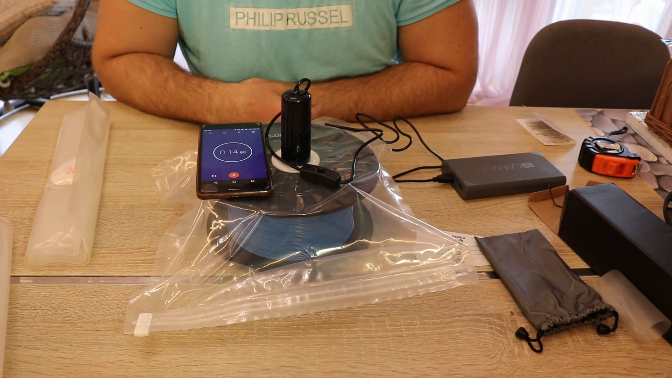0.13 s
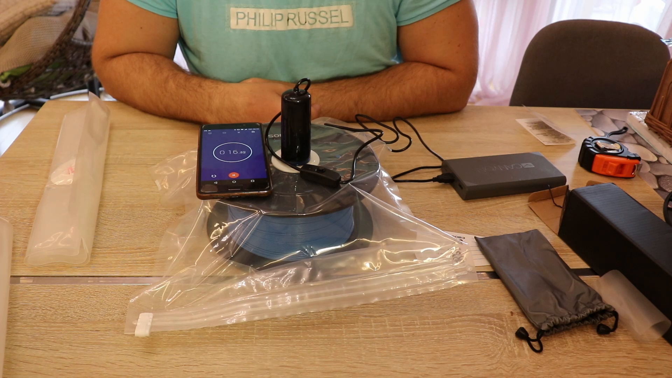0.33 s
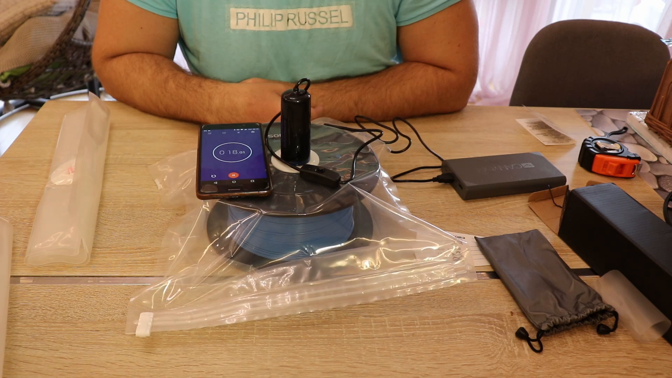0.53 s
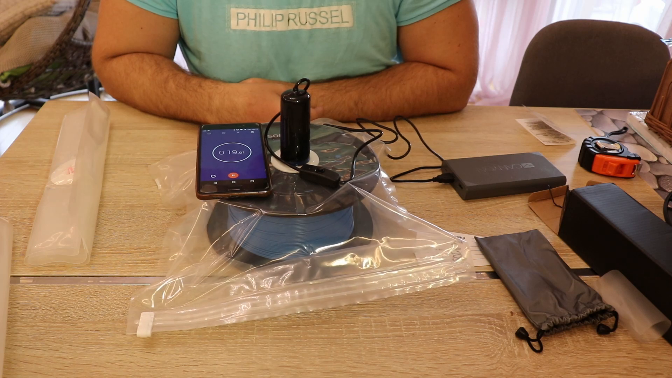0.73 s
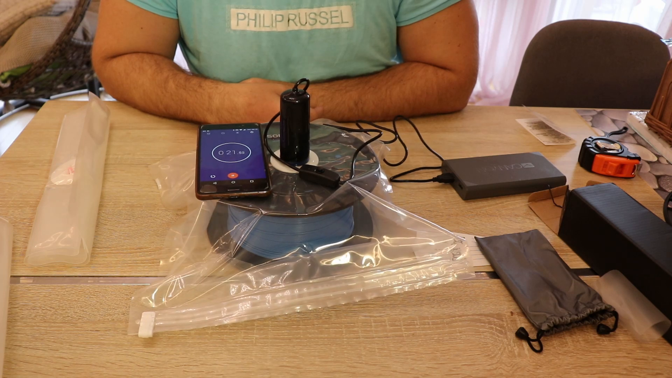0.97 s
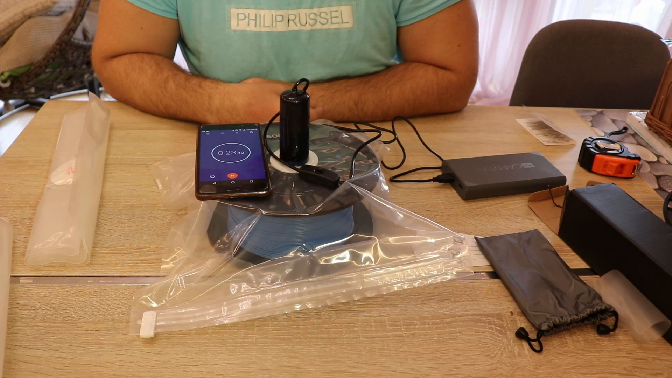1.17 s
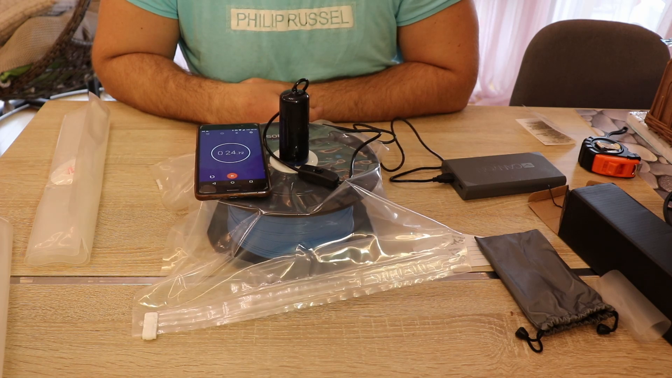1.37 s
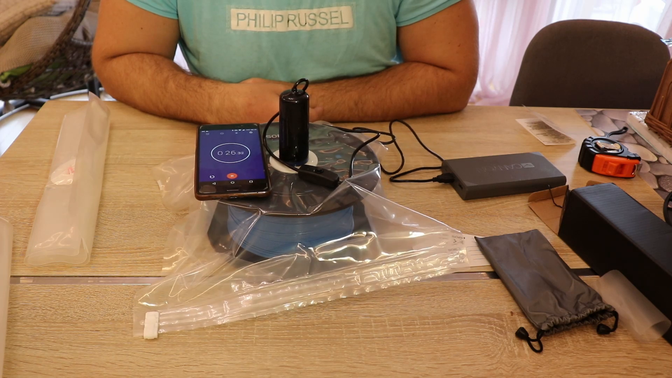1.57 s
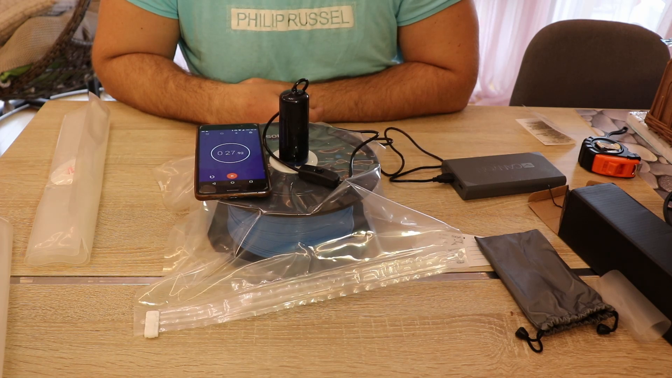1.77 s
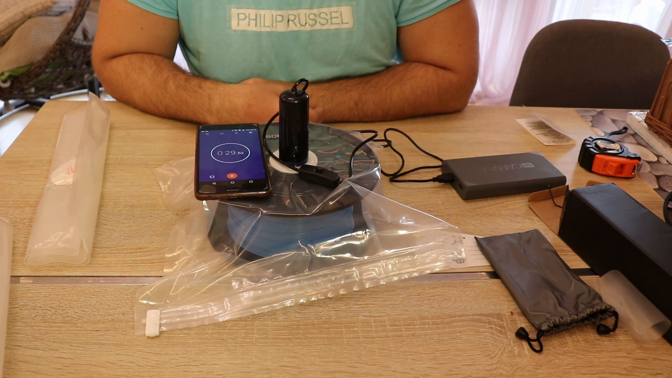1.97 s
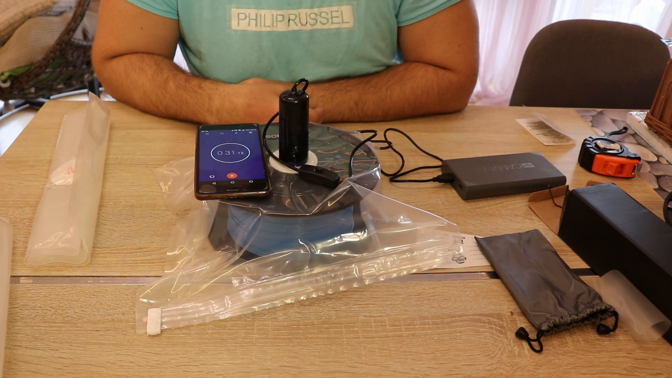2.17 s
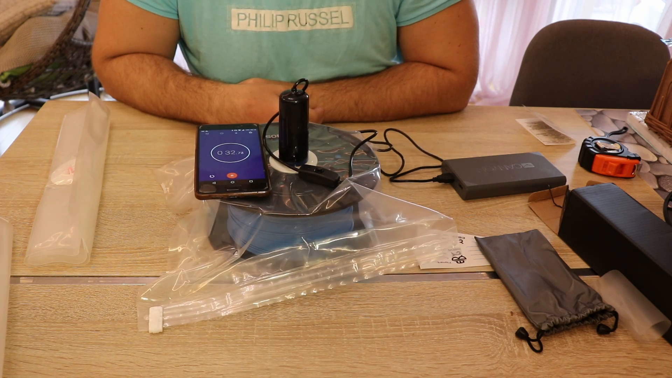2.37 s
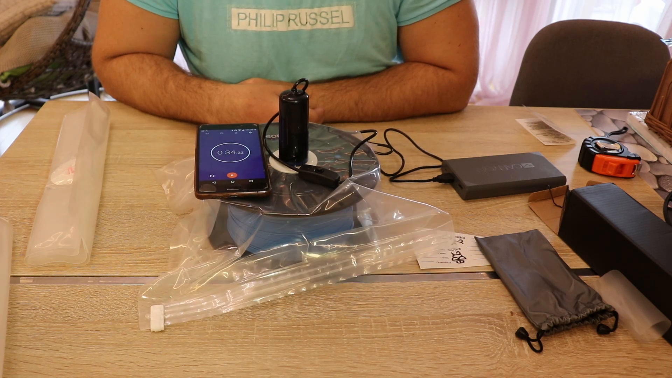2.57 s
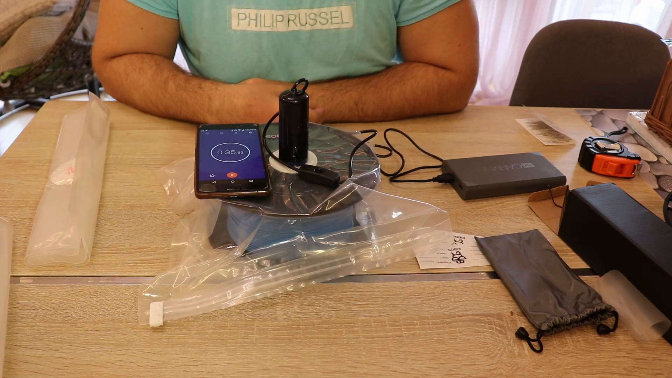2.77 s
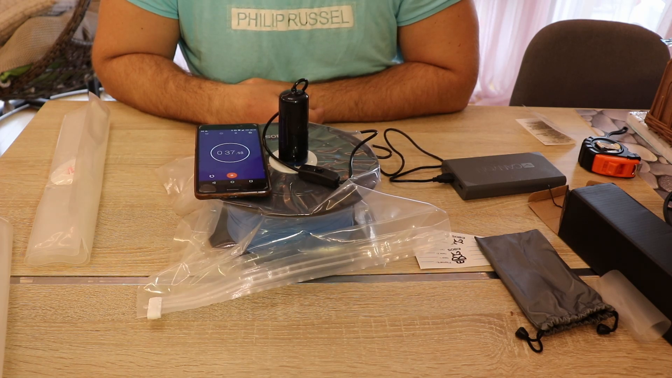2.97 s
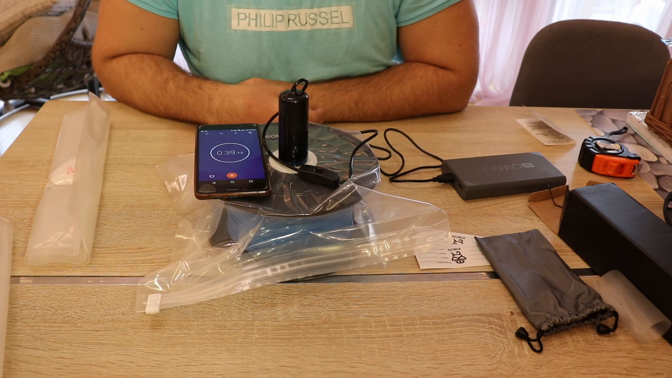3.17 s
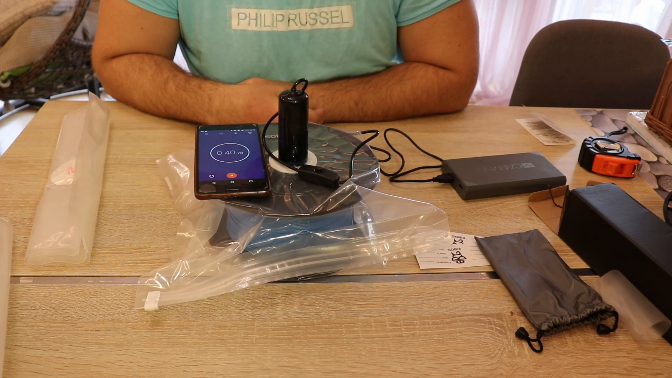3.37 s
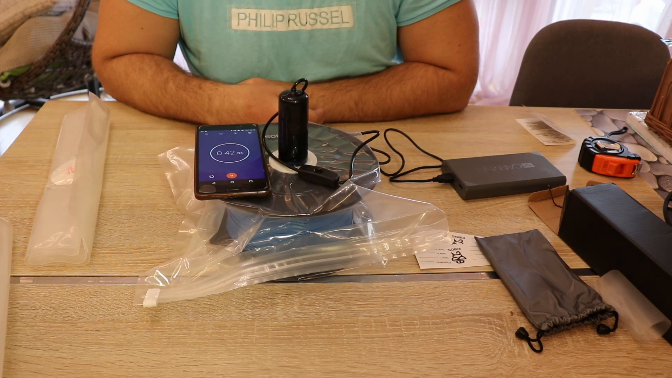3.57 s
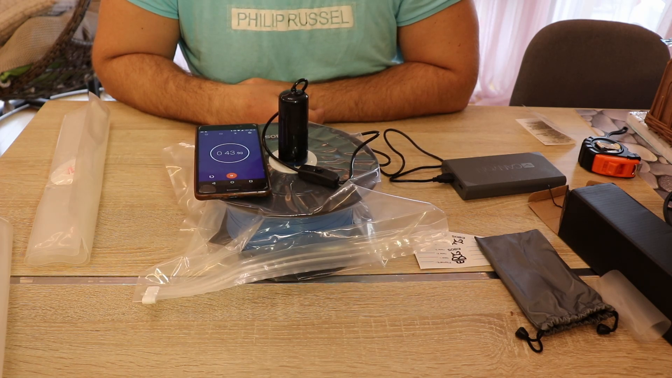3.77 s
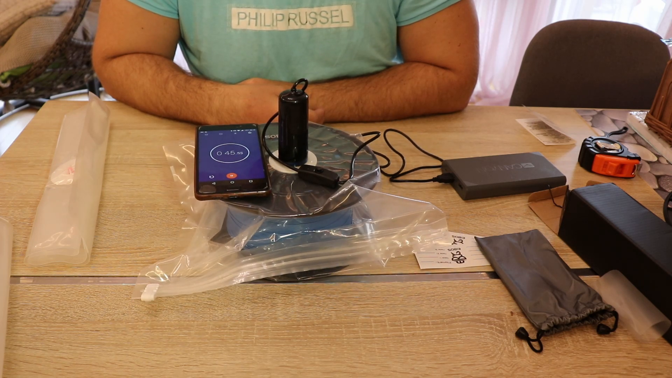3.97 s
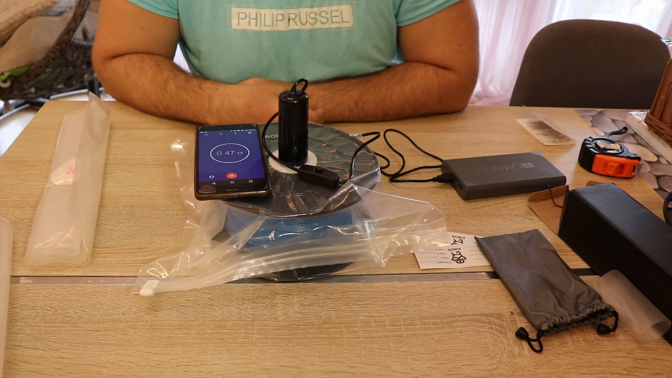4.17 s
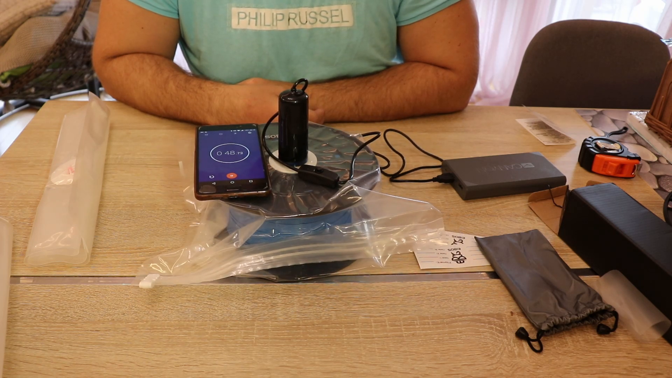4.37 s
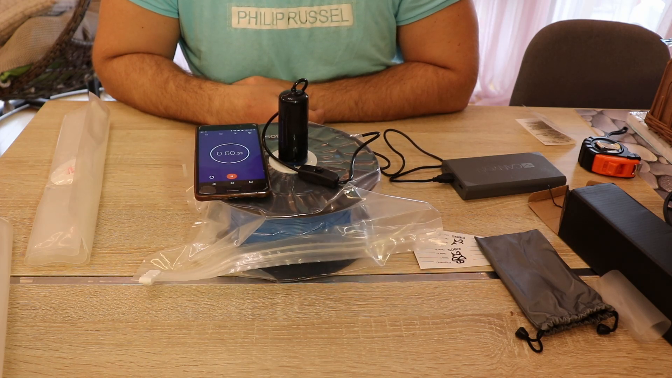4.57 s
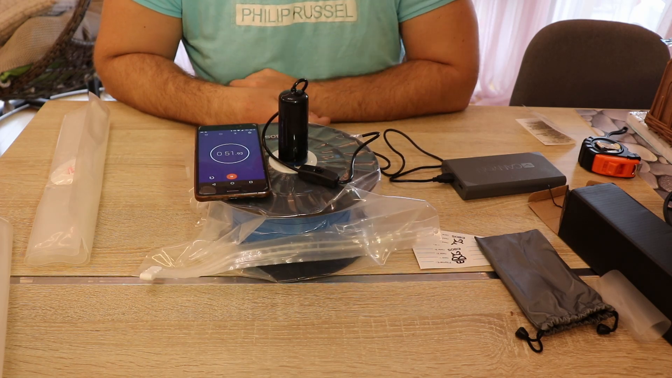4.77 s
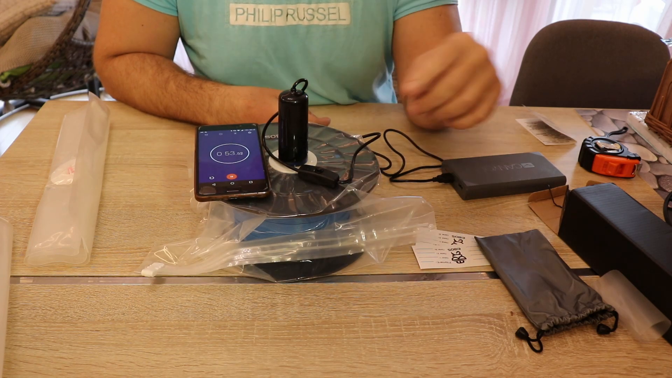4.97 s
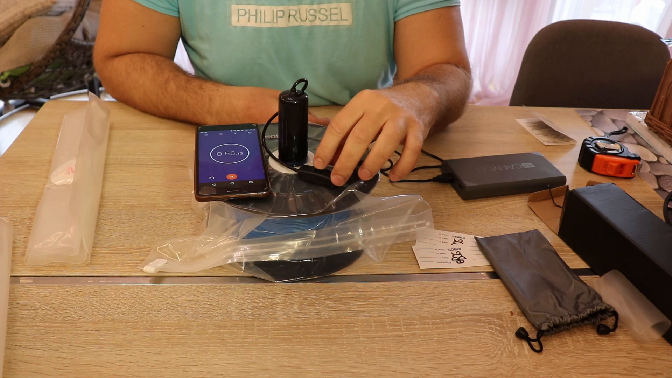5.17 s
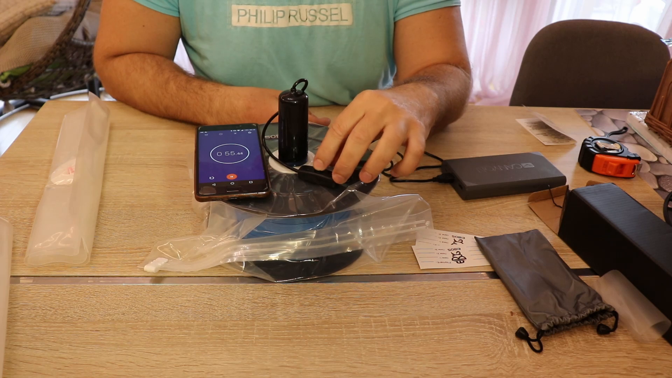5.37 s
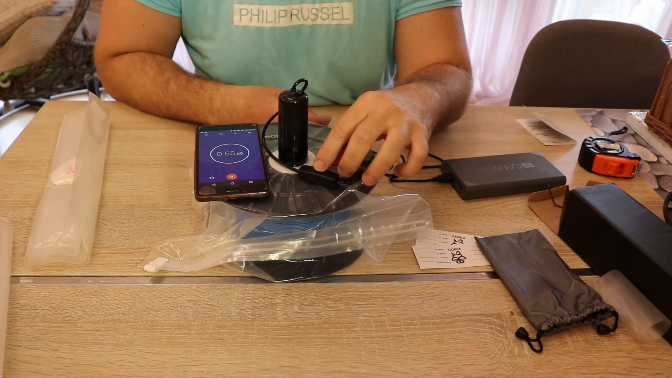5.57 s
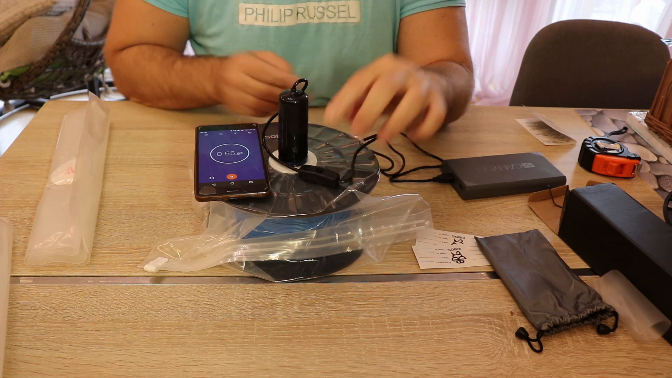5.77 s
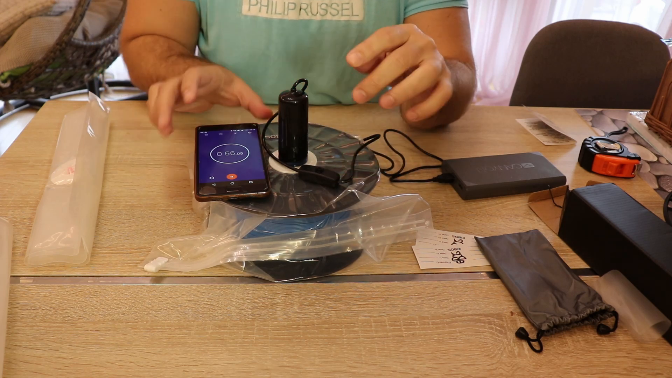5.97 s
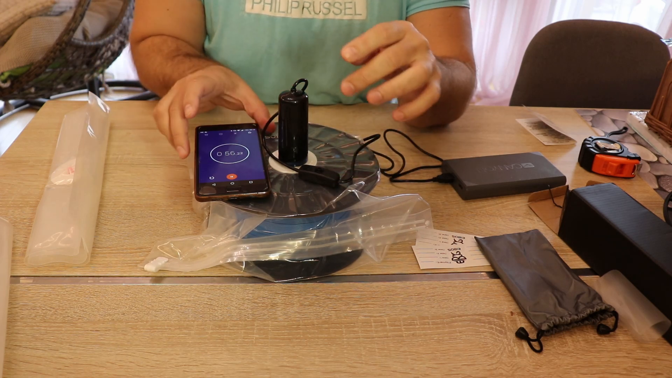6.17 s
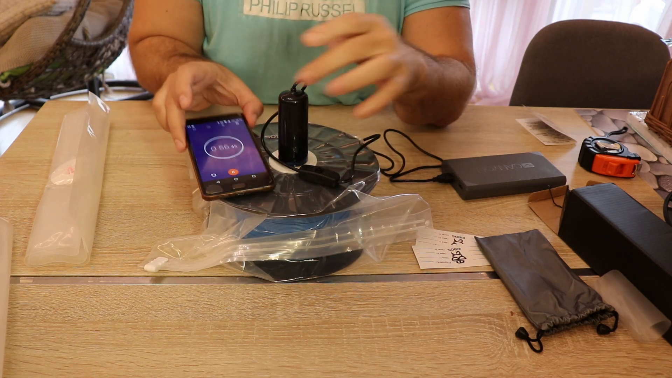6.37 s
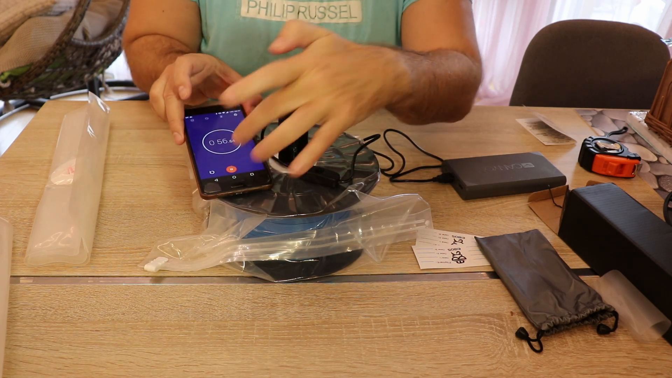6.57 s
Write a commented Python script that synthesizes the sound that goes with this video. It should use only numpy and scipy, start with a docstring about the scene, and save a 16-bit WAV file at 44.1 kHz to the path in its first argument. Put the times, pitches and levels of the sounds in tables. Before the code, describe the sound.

A small electric vacuum pump is already running at 0 s, close to the microphone on a wooden table in a quiet room. Its buzz is bright and even, around a hundred pulses a second, with thin hiss. At about 0.65 s it turns rougher and more nasal, with rattling and jingling parts. From 1.7 s a thin valve tone comes and goes, strongest from 3 to 4.1 s, while the hum deepens. Faint film crinkles begin near 1.7 s; sharper pops come at 3.8, 4.1 and 4.6 s. The strained motor sags in pitch from 4.6 s. At 5.24 s a hand presses and the buzz jumps up; from 5.43 s it coasts down rapidly, gone by 5.6 s. Switch clacks with woody thumps land at 5.6 and 5.75 s. Soft, low valve burps then slow until 6.6 s, over table rumble, room tone and a faint crinkle at 6.3 s.

```python
"""On a wooden table indoors, a small electric vacuum pump sucks the air out of a plastic bag holding a spool.
Each shaft turn sends a pulse through resonances of diaphragm, valves and casing: a hum and buzz that shift
as the vacuum grows. The film crinkles in short noise bursts; a hand presses the pump, and it is switched off.
The shaft coasts down, the switch clacks twice as filtered snaps with a spool thump, and the valve burps
ever more slowly as paired kicks into resonances. Room tone and table rumble are shaped noise."""
import sys
import numpy as np
from scipy import signal
from scipy.fft import rfft, irfft, next_fast_len
from scipy.io import wavfile
from scipy.ndimage import map_coordinates

SR = 44100
rng = np.random.default_rng(int(sys.argv[2]) if len(sys.argv) > 2 else 0)


def generate_wav(signal):
    """Clip the signal to [-1, 1] and save it as 16-bit WAV at the path in sys.argv[1]."""
    frames = np.transpose(np.atleast_2d(signal))
    scaled = np.clip(frames, -1, 1) * 32767
    pcm = np.round(scaled).astype(np.int16)
    wavfile.write(sys.argv[1], SR, pcm)


N = 292383  # length in samples

# shaft speed before the press, wander and coasting are applied: start_s [s], speed_hz [turns/s]
SHAFT_SPEED = [(0, 97.8), (.6, 97.5), (.68, 98.7), (1.38, 99.6), (1.51, 98), (1.64, 99.5), (1.78, 98),
               (1.93, 100.4), (2.2, 98.9), (2.45, 99.7), (2.72, 99.6), (2.78, 98.1), (2.98, 98.2),
               (3.1, 96.7), (3.68, 94.1), (4.1, 95.9), (4.24, 95.7), (4.33, 99.9), (4.47, 100.4),
               (4.58, 98.5), (4.68, 93.6), (4.8, 89.9), (4.98, 89), (5.08, 85.8), (5.23, 85.2)]
# spectrum of the escaping air: pitch_hz [Hz], relative level_db [dB per Hz]
AIR_SPECTRUM = [(60, -30), (300, -20), (900, 0), (1300, -3), (1900, 2), (2600, -1), (3100, -12), (3650, -4),
                (4200, -13), (5000, -6), (5600, -5), (6200, -14), (7200, -3), (8000, -3), (8700, -3),
                (10000, -15), (12500, -14), (13500, -10), (15500, -16)]
# vacuum grows as a power of time until the press; labour rises only when it is nearly full
VACUUM_POWER, LABOUR_POWER, FULL_LABOUR = 2.08, 4.1, 0.84
# the pressing hand: onset, rise time, added shaft speed, added buzz and air levels
PRESS_S, PRESS_RISE_S, PRESS_HZ, PRESS_BUZZ_DB, PRESS_AIR_DB = 5.238, 0.02, 7, 3.5, 5
# power off: speed decays with time constant COAST_S; the buzz falls as this power of speed
OFF_S, COAST_S, BUZZ_FALL_POWER, HUM_FALL_POWER = 5.433, 0.085, 1.15, 0.35
STOP_S, STOP_FADE_S = 5.61, 0.074  # end and length of the final fade
CASING_DB, CASING_LOAD_DB = -54, 2.5  # with the bag slack; added by full vacuum
AIR_DB, AIR_SWELL = -6.3, 0.55  # air against the casing; depth of its swell once a turn


def pump():
    """Periodic excitation: the shaft drives every part once a turn, then coasts down exponentially."""
    t = np.arange(N) / SR
    vacuum = np.minimum(t / PRESS_S, 1) ** VACUUM_POWER
    labour = FULL_LABOUR * vacuum ** LABOUR_POWER
    press = ramp(PRESS_S, PRESS_RISE_S)
    coast = np.exp(-np.maximum(t - OFF_S, 0) / COAST_S)

    driven_hz = curve(SHAFT_SPEED) + PRESS_HZ * press + .25 * looseness() * wobble(18)
    turns = np.cumsum(driven_hz * coast) / SR
    turns += -turns[round(OFF_S * SR)] % 1  # the coasting starts from a stroke

    valve_buzz, valve_song = valves(turns, vacuum)
    casing_gain = amp(CASING_DB + CASING_LOAD_DB * vacuum)
    struck = valve_buzz + casing_gain * casing(turns, labour)
    buzz = restruck(struck, labour) + whines(turns) + jingle(turns)
    swell = 1 + AIR_SWELL * np.cos(2 * np.pi * turns)
    air = casing_gain * amp(AIR_DB) * unit(noise(AIR_SPECTRUM) * swell)

    low = coast ** HUM_FALL_POWER * diaphragm(turns, vacuum, labour, press, coast)
    bright = amp(PRESS_BUZZ_DB * press) * coast ** BUZZ_FALL_POWER * (buzz + coast * valve_song)
    hiss = amp(PRESS_AIR_DB * press) * coast ** 2 * air
    stop_fade = 1 - ramp(STOP_S - STOP_FADE_S, STOP_FADE_S)
    return stop_fade * (low + bright + hiss + last_strokes(turns))


# thud transmitted through spool and table: pitch_hz [Hz], relative level_db [dB]
THUD_RESPONSE = [(60, -33), (100, -31), (140, -2), (170, 1.5), (295, 3), (330, -9), (380, -20),
                 (600, -19.5), (1500, -64)]
# the pump scuffing on its seat: pitch_hz [Hz], relative level_db [dB]
GRIT_SPECTRUM = [(120, -26), (250, 2), (420, -1.5), (850, -10.5), (1300, -5.5), (3000, -40)]
# first shaft order, before unsteadiness and coasting: start_s [s], level_db [dB]
FUNDAMENTAL_LEVEL = [(0.0, -61), (0.1, -63), (1.56, -59), (2.91, -58.5), (3.17, -55), (4.65, -54.5),
                     (4.78, -61), (5.22, -53)]
HUM_DB, HUM_LOAD_DB, PRESS_HUM_DB = -51, 11, 4.5  # bag slack; added by full vacuum; added by the press
GRIT_DB = -6.5  # against the hum, at a labour of 1
# the bag draws tight on the spool and brings out the fourth shaft order
TIGHT_S, TIGHTEN_S = 3.42, 0.53
FOURTH_DB, FOURTH_TIGHT_DB, PRESS_FOURTH_DB = -70.5, 16.5, 8


def diaphragm(turns, vacuum, labour, press, coast):
    """Forced vibration: the stroke's thud grows with load; labour adds friction noise from the seat."""
    hum_db = HUM_DB + HUM_LOAD_DB * vacuum + PRESS_HUM_DB * press
    strokes = pulses(turns, scatter_db=.5)
    thud = unit(coloured(strokes, lambda f: along(THUD_RESPONSE, f)))
    grit = amp(GRIT_DB) * labour ** 2 * noise(GRIT_SPECTRUM)
    fourth_db = FOURTH_DB + FOURTH_TIGHT_DB * ramp(TIGHT_S, TIGHTEN_S) + PRESS_FOURTH_DB * press
    first = shaft_tone(turns, curve(FUNDAMENTAL_LEVEL), order=1)
    fourth = shaft_tone(turns, fourth_db, order=4)
    return amp(hum_db) * (thud + grit) + coast ** 2 * (first + fourth)


def shaft_tone(turns, level_db, order):
    """Harmonic of rotation: a sine at a whole multiple of the shaft speed, slightly unsteady in level."""
    return amp(level_db + 0.55 * wobble(30.55)) * unit(np.sin(2 * np.pi * order * turns))


# resonances of the intake: pitch_hz [Hz], width_hz [Hz], relative level_db [dB]
INTAKE_MODES = [(535, 50.3, 0.5), (730, 79, 3), (807, 152, 0), (901, 59, 5)]
# colour of the outlet, narrow and wide open: pitch_hz [Hz], relative level_db [dB]
OUTLET_NARROW = [(1500, -53.5), (1850, -1), (2060, 2), (2180, -11.5), (2290, -1), (2490, 1.5), (2600, -5.5),
                 (2750, -19), (3100, -48.5)]
OUTLET_OPEN = [(1900, -60.5), (2250, -13), (2450, -0.5), (2680, -3), (2860, -1.5), (2980, -26), (3150, -38)]
# the valve sings as air rushes in: start_s [s], end_s [s], tone lift_db [dB], intake lift_db [dB]
SONG_SPELLS = [(1.68, 2.33, 6.5, -2), (2.74, 3.06, 15.5, 3), (3.06, 4.12, 25.5, 5.5), (4.12, 4.33, 16.5, 5),
               (4.56, 4.74, 16, 6.5)]
# the outlet rattles: start_s [s], end_s [s], lift_db [dB], opening [0 to 1]
RATTLE_SPELLS = [(0.67, .95, 7, 0.87), (.95, 1.15, 4, 1), (1.15, 1.7, 2.5, 0.43), (1.7, 1.87, 7, 0.19),
                 (2.1, 2.74, 7.5, 0.03), (2.74, 3.04, 11, 0.03), (3.04, 3.26, 6.5, 0.3),
                 (3.6, 3.88, 9.5, 0.44), (4.25, 5.6, 9, 0.9)]
INTAKE_DB = -56.5
OUTLET_DB, OUTLET_LOAD_DB = -58.5, -6  # bag slack; added by full vacuum
SONG_DB, SONG_EDGE_S, RATTLE_EDGE_S = -66, 0.17, 0.009  # tone level before its lift; spell edges
FREE_END_S, FREE_FADE_S = 0.64, 0.066  # free flow starts to give way; length of the crossfade


def valves(turns, vacuum):
    """Pulsed flow through resonators: intake, flap and outlet buzz; the valve sings on the tenth order."""
    song_db, rush_db = spells(SONG_SPELLS, SONG_EDGE_S)
    rattle_db, opening = spells(RATTLE_SPELLS, RATTLE_EDGE_S)
    opening = np.clip(opening, 0, 1)

    intake_strokes = part(turns, t60=.025, rebound=.45, drift=.02, rough=.1)
    intake = amp(INTAKE_DB + rush_db) * unit(ringing(intake_strokes, INTAKE_MODES))

    outlet_strokes = part(turns, t60=.03, rebound=.55, drift=.012, rough=.14)
    narrow = unit(coloured(outlet_strokes, lambda f: along(OUTLET_NARROW, f)))
    wide = unit(coloured(outlet_strokes, lambda f: along(OUTLET_OPEN, f)))
    rattle = np.sqrt(1 - opening) * narrow + np.sqrt(opening) * wide
    outlet = amp(OUTLET_DB + OUTLET_LOAD_DB * vacuum + rattle_db) * rattle

    resisting = ramp(FREE_END_S, FREE_FADE_S)
    buzz = resisting * (intake + outlet + flap_buzz(turns, song_db)) + (1 - resisting) * free_flow(turns)
    return buzz, shaft_tone(turns, SONG_DB + song_db, order=10)


# resonances of the flap, slack, slapping and taut: pitch_hz [Hz], width_hz [Hz], relative level_db [dB]
SLACK_MODES = [(1050, 203, -3.5), (1434, 42, -1.5), (1584, 109, 0), (1880, 168, 0.5), (1997, 130, 3),
               (2102, 78, -1.5)]
SLAP_MODES = [(1654, 730, 0)]
TAUT_MODES = [(980, 80, -3), (1410, 43, 3), (1750, 22, 1), (1926, 73, 2), (2124, 46, 4.5), (2445, 55, -2),
              (2613, 82, -4), (2910, 64, -7)]
# the flap's buzz, before a trim of -0.06 dB: start_s [s], level_db [dB]
FLAP_BUZZ_LEVEL = [(0.67, -51.5), (0.94, -53), (2.78, -50), (3.04, -54), (3.33, -52), (3.74, -41.5),
                   (4.1, -47.5), (4.39, -46), (4.54, -45.5), (4.71, -48), (5.22, -43)]
SLAP_DB, TAUT_DB = -4.5, -1  # slap against the slack chatter; taut against slack flap
SLAP_DUCK = 0.26  # dB of slap lost for each dB of song
TAUT_S, TAUTEN_S = 4.51, 0.81  # the vacuum starts to pull the flap taut; time it takes


def flap_buzz(turns, song_db):
    """Tension shifts the modes: a slack flap slaps and chatters, a taut one rings at other pitches."""
    beats = part(turns, t60=.04, rebound=.45, drift=.012, rough=.14)
    slaps = part(turns, t60=.03, rebound=.3, drift=.011, rough=.12)
    slap = amp(SLAP_DB - SLAP_DUCK * song_db) * unit(ringing(slaps, SLAP_MODES))
    slack = unit(chatter(beats, SLACK_MODES, swing_db=1.8) + slap)
    taut = amp(TAUT_DB) * unit(ringing(beats, TAUT_MODES))
    tension = ramp(TAUT_S, TAUTEN_S)
    flap = np.sqrt(1 - tension) * slack + np.sqrt(tension) * taut
    return amp(curve(FLAP_BUZZ_LEVEL) - 0.06) * flap


# buzz while the bag is still plump: pitch_hz [Hz], relative level_db [dB]
FREE_FLOW_RESPONSE = [(300, -36), (400, -20), (490, -7), (585, -13), (685, -6.5), (780, -3.5), (980, -0.5),
                      (1070, -14), (1400, -15.5), (1650, -10), (2300, -12.5), (2440, -0.5), (2840, -4),
                      (2960, -19), (3150, -17), (3310, -13), (3500, -34), (4300, -31), (4900, -15),
                      (5200, -45), (5550, -15), (6200, -33), (6900, -15), (7350, -4), (7600, -26),
                      (10000, -34)]
FREE_DB = -45.5


def free_flow(turns):
    """Unloaded flow: a bright, even buzz while the bag does not yet resist."""
    strokes = part(turns, t60=.09, rebound=.3, drift=.007, rough=.11)
    return amp(FREE_DB) * unit(coloured(strokes, lambda f: along(FREE_FLOW_RESPONSE, f)))


# resonances of the casing: pitch_hz [Hz], width_hz [Hz], relative level_db [dB]
CASING_MODES = [(3382, 45, -1), (3684, 74, 2.5), (4130, 90, -11), (4620, 184, -5.5), (5027, 83, -2.5),
                (5340, 120, -5), (5640, 180, -3.5), (7950, 150, 2.5), (8440, 150, -4.5), (9060, 520, -6.5),
                (11570, 95, -7), (13400, 1000, -11)]
# colour of the loaded knock: pitch_hz [Hz], relative level_db [dB]
KNOCK_RESPONSE = [(2200, -49), (2950, -9), (3100, -11), (3300, 6), (3450, -8), (3620, 6), (3750, 3.5),
                  (3970, 5.5), (4350, -3.5), (4700, -8), (4930, 6), (5150, -3), (5550, 1), (6100, -13),
                  (6700, -25), (7200, -20), (8100, -4), (8600, -3), (9700, -14.5), (10500, -20),
                  (13500, -17), (15500, -36)]
KNOCK_DB = 6  # against the ringing casing


def casing(turns, labour):
    """Modal ringing under impact: the casing rings freely, then is knocked harder as labour builds."""
    ring = part(turns, t60=.055, rebound=.4, drift=.002, rough=.12)
    impacts = part(turns, t60=.07, rebound=.45, drift=.004, rough=.09)
    body = chatter(ring, CASING_MODES, swing_db=1.6)
    knock = amp(KNOCK_DB) * unit(coloured(impacts, lambda f: along(KNOCK_RESPONSE, f)))
    return np.sqrt(1 - labour) * body + np.sqrt(labour) * knock


# gap between the two hits of a loaded stroke, before its wander: start_s [s], gap_s [s]
RESTRIKE_GAP = [(3.8, .0027), (4.25, .00305), (4.32, .0018), (4.5, .00185), (4.66, .0021), (4.85, .00215),
                (4.97, .00266), (5.1, .00246), (5.21, .00254), (5.25, .00304)]
RESTRIKE_WANDER_S, RESTRIKE_SHARE = 0.00005, 0.62  # second hit against the first, at a labour of 1


def restruck(x, labour):
    """Comb filtering: under load each stroke hits twice, and the shifting gap sweeps the notches."""
    share = RESTRIKE_SHARE * labour
    gap_s = curve(RESTRIKE_GAP) + RESTRIKE_WANDER_S * (1 - ramp(PRESS_S, PRESS_RISE_S)) * wobble(10)
    again = np.interp(np.arange(N) - gap_s * SR, np.arange(N), x)
    return (x + share * again) / np.sqrt(1 + share ** 2)


# spells of whine, the flap's mode near 1600 Hz and casing modes above: start_s [s], end_s [s], pitch_hz [Hz],
# level_db [dB]
WHINE_SPELLS = [(.67, 2.95, 1600, -59), (.67, 1.57, 3660, -65.5), (1.78, 2.74, 3410, -64),
                (2.74, 3.25, 6965, -56.5), (3.04, 3.45, 3660, -54.5), (3.45, 4.26, 3650, -57.5),
                (3.3, 5.6, 7410, -58), (4.3, 4.48, 1605, -49.5)]
WHINE_WIDTH_HZ, WHINE_EDGE_S = 47, .04


def whines(turns):
    """Selective resonance: the strokes set narrow modes ringing in spells, the flap's near 1600 Hz and the
    casing's higher up."""
    strokes = pulses(turns, scatter_db=.4)
    total = np.zeros(N)
    for start_s, end_s, pitch_hz, level_db in WHINE_SPELLS:
        level = spells([(start_s, end_s, amp(level_db))], WHINE_EDGE_S)[0]
        total += level * unit(ringing(strokes, [(pitch_hz, WHINE_WIDTH_HZ, 0)]))
    return total


# resonances of a loose part: pitch_hz [Hz], width_hz [Hz], relative level_db [dB]
JINGLE_MODES = [(4930, 100, -9), (6470, 270, -10.5), (6964, 84, 3), (7447, 118, 4), (8140, 280, -20)]
# jingle averaged over its bouts: start_s [s], level_db [dB]
JINGLE_CURVE = [(0, -49), (.62, -51.5), (.75, -51.5), (1.3, -51), (1.65, -51.5), (2.03, -55), (2.2, -54),
                (2.55, -52.5), (2.99, -51), (3.01, -62), (3.04, -65), (3.06, -53.5), (3.23, -49),
                (3.34, -56), (3.55, -50), (3.8, -53.5), (4.42, -49.5), (4.6, -55), (4.72, -50.5),
                (5.2, -52.5), (5.3, -52.5)]
BOUT_KNOTS_PER_S, BOUT_DROP_DB, BOUT_BIAS = 42, 4.5, 0.4  # a positive bias favours sounding over resting


def jingle(turns):
    """Intermittent contact: a loose part, struck once a turn, abruptly catches and lets go."""
    strokes = part(turns, t60=.05, rebound=.25, drift=.002, rough=.04)
    resting = .5 - .5 * np.tanh(5 * (wobble(BOUT_KNOTS_PER_S) + BOUT_BIAS))
    bouts = amp(-BOUT_DROP_DB * resting * (1 - ramp(PRESS_S, PRESS_RISE_S)))
    return amp(curve(JINGLE_CURVE)) * unit(bouts * chatter(strokes, JINGLE_MODES, swing_db=1))


# flap ticks, and spool and table ringing: pitch_hz [Hz], width_hz [Hz], relative level_db [dB]
TICK_MODES = [(1360, 180, -0.5), (2010, 310, -8.5)]
SPOOL_MODES = [(168, 20, -4), (229, 29, 2), (280, 22, 0)]
TICK_DB, TICK_FADE_S, SPOOL_DB = 0.5, 0.082, 14.5  # gains of the two resonators; fade of the ticks


def last_strokes(turns):
    """Impulse response: with the power off, ever slower and weaker strokes tick the flap and ring the spool."""
    since = np.arange(N) / SR - OFF_S
    strokes = (since > 0) * pulses(turns, scatter_db=1.5)
    ticks = ringing(np.exp(-(since / TICK_FADE_S) ** 2) * strokes, TICK_MODES)
    spool = ringing(np.exp(-np.abs(since) / COAST_S / 2) * strokes, SPOOL_MODES)
    return amp(TICK_DB) * ticks + amp(SPOOL_DB) * spool


def part(turns, t60, rebound, drift, rough):
    """Impact and rebound: a stroke each turn, a fluttering bounce, and air noise that swells once a turn."""
    loose = looseness()
    stroke = smeared(pulses(turns, scatter_db=.7), t60)
    bounce = smeared(pulses(turns + drift * loose * wobble(9), scatter_db=1.3), t60)
    share = rebound * loose * wobble(11)  # angle of an equal-power mix
    hits = unit(np.cos(share) * stroke + np.sin(share) * bounce)
    swell = 1 + .8 * np.cos(2 * np.pi * turns)
    puff = rng.standard_normal(N) * swell * (1 - ramp(OFF_S, COAST_S / 2))
    flutter = amp(.9 * loose * wobble(22))
    return flutter * (hits + rough * unit(puff))


def chatter(x, modes, swing_db):
    """Unsteady coupling: each resonance of a loosely seated part catches and lets go on its own."""
    total = np.zeros(N)
    for k, mode in enumerate(modes):
        grip = amp(swing_db * looseness() * np.tanh(2 * wobble(11)))
        total += (-1) ** k * grip * ringing(x, [mode])
    return unit(total)


PRESS_GRIP = 0.67  # share of the parts' looseness that the hand takes away


def looseness():
    """Mechanical constraint: 1 while the pump stands free, small once the hand holds it."""
    return 1 - PRESS_GRIP * ramp(PRESS_S, PRESS_RISE_S)


def pulses(turns, scatter_db):
    """Impulse train: one band-limited pulse for each whole turn, placed between samples."""
    at = np.interp(np.arange(1, int(turns[-1])), turns, np.arange(N))
    size = amp(scatter_db * rng.standard_normal(N // 100)[:len(at)])
    index = at.astype(int)[:, None] + np.arange(-7, 9)
    offset = index - at[:, None]
    shape = np.sinc(offset) * np.cos(np.pi * offset / 16) ** 2  # windowed sinc
    return np.bincount(np.clip(index, 0, N - 1).ravel(), (size[:, None] * shape).ravel(), N)


def smeared(x, t60, size=4096):
    """All-pass dispersion: random phase spreads each pulse into a short chatter of unchanged spectrum."""
    z = rfft(rng.standard_normal(size) * amp(-60 * np.arange(size) / SR / t60))
    kernel = np.roll(irfft(z / np.abs(z)), size // 4)
    return signal.oaconvolve(x, kernel)[size // 4:][:len(x)]  # undo the roll's delay


# the switch snaps and knocks on the spool: start_s [s], snap level_db [dB, less 19 and scaled by energy],
# snap t60_s [s], thump level_db [dB, less 4]
SWITCH_CLACKS = [(5.5917, -4, 0.015, -23.5), (5.753, -6.5, 0.013, -22.5)]
# colour of the switch going down and up: pitch_hz [Hz], relative level_db [dB]
DOWN_RESPONSE = [(59, -36), (100, -9.5), (313, -9.5), (758, -14), (1130, -1.5), (1430, -8.5), (2990, -9.5),
                 (3250, -11.5), (4020, -7.5), (5280, -21), (7730, -11), (8770, -12.5), (9950, -25.5),
                 (12000, -25), (15500, -18)]
UP_RESPONSE = [(59, -26), (100, -7), (340, -5), (758, -13.5), (977, -5.5), (1520, -5), (1920, -12.5),
               (3180, -11.5), (4190, -14.5), (4660, -12.5), (5870, -11.5), (8580, -9.5), (9950, -22),
               (10800, -17), (15500, -16)]
CLACK_ROOM_DB = -12  # the room's answer against the snap
SPOOL_HZ, SPOOL_T60_S = 288, 0.058


def clacks():
    """Contact impact: the switch goes down and up with a snap and rattle, a spool thump and room reflections."""
    out, t = np.zeros(N), np.arange(SR // 5) / SR
    for (start_s, level_db, t60, thump_db), response in zip(SWITCH_CLACKS, [DOWN_RESPONSE, UP_RESPONSE]):
        contact = rng.standard_normal(len(t)) * amp(-60 * t / t60)
        contact[0] = 3  # the hard first touch
        crack = coloured(contact, lambda f: along(response, f))
        snap = coloured(signal.unit_impulse(len(t)), lambda f: along(response, f))
        size = amp(level_db - 19.0) * np.sqrt(t60 * SR)
        thump = np.sin(2 * np.pi * SPOOL_HZ * t) * amp(-60 * t / SPOOL_T60_S)
        add(out, start_s, size * crack / np.linalg.norm(crack) + amp(thump_db - 4.0) * thump)
        add(out, start_s, size * amp(CLACK_ROOM_DB) * walls(snap / np.linalg.norm(snap)))
    return out


# buckles of the film: start_s [s], level_db [dB, less 17.5 and scaled by energy],
# centre pitch_hz [Hz], width [octaves], t60_s [s]
FILM_BUCKLES = [(1.668, -28.5, 2970, 0.38, 0.013), (1.669, -31.5, 480, 1.6, 0.025),
                (1.713, -31.5, 1030, 1.25, 0.063), (3.289, -29, 500, 0.81, 0.079),
                (3.508, -31, 1019, 0.89, 0.052), (3.841, -16.5, 3260, 0.59, 0.009),
                (3.839, -23, 800, 1.4, 0.023), (4.0904, -10, 2440, 1.47, 0.014),
                (4.0909, -18, 5440, 0.088, 0.011), (4.0963, -14.5, 1380, 2.4, 0.032),
                (4.101, -29, 2400, 1.6, 0.046), (4.373, -21.5, 1800, 1.15, 0.012),
                (4.557, -25.5, 1290, 0.79, 0.061), (4.642, -11.5, 1400, 0.67, 0.0091),
                (4.729, -26, 1470, 1.4, 0.031), (4.926, -31, 2620, 0.27, 0.1),
                (4.99, -31.5, 570, 1.5, 0.053), (6.301, -42, 1500, 0.88, .02),
                (6.327, -33.5, 925, 0.41, 0.014)]
FILM_TOP_HZ = 8000


def crinkles():
    """Snap-through buckling: each jump of the film is a spiky noise burst around its own pitch."""
    out, t = np.zeros(N), np.arange(SR // 8) / SR
    for start_s, level_db, pitch_hz, octaves, t60 in FILM_BUCKLES:
        grains = rng.standard_normal(len(t)) * amp(2 * rng.standard_normal(len(t)))
        burst = grains * amp(-60 * t / t60) * (1 - np.exp(-t / .0008))

        def film_db(f):
            band = 1 + (np.log2((f + 1) / pitch_hz) / octaves) ** 4
            softness = (1 + f / pitch_hz) * (1 + (f / FILM_TOP_HZ) ** 6)
            return -10 * np.log10(band) - 10 * np.log10(softness)

        snap = coloured(burst, film_db)
        add(out, start_s, amp(level_db - 17.5) * np.sqrt(t60 * SR) * snap / np.linalg.norm(snap))
    return out


# air slips back through the valve: start_s [s], level_db [dB, before the gain into the resonances]
VALVE_BURPS = [(5.479, -37), (5.509, -33), (5.544, -33.5), (5.67, -31), (5.741, -34), (5.829, -32.5),
               (5.925, -31.5), (6.02, -33), (6.141, -32.5), (6.28, -33), (6.435, -34.5), (6.626, -38)]
# resonances of the valve: pitch_hz [Hz], width_hz [Hz], relative level_db [dB]
BURP_RESONANCES = [(418, 113, -7.5), (773, 134, -11.5), (1460, 300, -29)]


def burps():
    """Relaxation oscillation: the valve lifts and falls shut 4.92 ms later, each time kicking its resonances."""
    kicks = np.zeros(N)
    for start_s, level_db in VALVE_BURPS:
        add(kicks, start_s, amp([level_db + 39.0]))
        add(kicks, start_s + 0.00492, amp([level_db + 34.0]))
    return ringing(kicks, BURP_RESONANCES)


# reverberation time: pitch_hz [Hz], t60_s [s]
WALL_DECAY = [(200, 0.54), (1000, 0.3), (7000, 0.31), (15000, 0.031)]


def walls(x):
    """Reverberation: a diffuse tail, delayed 5 ms, in which each frequency decays at its own rate."""
    hz, t, z = signal.stft(rng.standard_normal(SR // 2), SR, nperseg=256)
    decay = amp(-60 * t / along(WALL_DECAY, hz)[:, None])
    tail = signal.istft(z * decay, SR, nperseg=256)[1]
    return signal.oaconvolve(x, np.pad(tail / np.linalg.norm(tail), (SR // 200, 0)))[:N]


# steady room tone: pitch_hz [Hz], relative level_db [dB per Hz]
ROOM_SPECTRUM = [(12, -23), (20, 0), (47, 5), (85, 2), (196, 7.5), (342, 3), (393, 1.5), (549, 0),
                 (614, 1.5), (767, 8), (985, 8.5), (1100, 4), (1980, -3.5), (12800, -10.5), (15500, -15)]
# table rumble, before its random lumps: start_s [s], level_db [dB]
HANDLING_LEVEL = [(0, -83), (5.2, -62), (5.3, -49), (5.9, -54), (6.1, -58.5), (6.63, -52.5)]


def background():
    """Stationary and modulated noise: room tone, and the lumpy rumble of arms moving on the table."""
    rumble = noise([(15, 0), (30, -14), (55, -9), (90, -16), (120, -20), (250, -12.5), (700, -50)])
    lumps = amp(2.5 * wobble(9))
    return amp(-57.0) * noise(ROOM_SPECTRUM) + amp(curve(HANDLING_LEVEL)) * lumps * rumble


def noise(spectrum):
    """Spectral shaping: random noise of rms 1 with the given spectrum."""
    return unit(filtered(rng.standard_normal(N), lambda f: amp(along(spectrum, f))))


def ringing(x, modes):
    """Modal synthesis: parallel resonances of alternating sign, each applied twice for steep skirts."""
    def response(f):
        total = 0
        for k, (pitch, width, level_db) in enumerate(modes):
            resonance = 2j * f * width / (pitch * pitch - f * f + 2j * f * width)
            total = total + (-1) ** k * amp(level_db) * resonance ** 2
        return total
    return filtered(x, response)


def coloured(x, gain_db, size=2048):
    """Minimum-phase filtering: the folded cepstrum makes a causal filter from a dB curve of frequency."""
    cepstrum = irfft(np.log(amp(gain_db(np.fft.rfftfreq(size, 1 / SR))) + 1e-6))
    cepstrum[1:size // 2] *= 2
    cepstrum[size // 2 + 1:] = 0
    return signal.oaconvolve(x, irfft(np.exp(rfft(cepstrum))))[:len(x)]


def filtered(x, response):
    """Linear filtering: the spectrum of x times a complex response of frequency."""
    m = next_fast_len(len(x) + SR // 4, True)
    return irfft(rfft(x, m) * response(np.fft.rfftfreq(m, 1 / SR)), m)[:len(x)]


def wobble(rate):
    """Random modulation: a smooth curve with rate knots a second."""
    knots = rng.standard_normal(int(N * rate / SR) + 4)
    coarse = np.arange(0, N, 64)
    return np.interp(np.arange(N), coarse, map_coordinates(knots, [coarse * rate / SR]))


def ramp(start_s, length_s):
    """Linear envelope: a straight rise from 0 to 1."""
    return np.clip((np.arange(N) / SR - start_s) / length_s, 0, 1)


def spells(rows, edge_s):
    """Gating: for each column after start and end, its value during a spell and zero between spells."""
    gates = [ramp(start - edge_s / 2, edge_s) - ramp(end - edge_s / 2, edge_s) for start, end, *_ in rows]
    return np.transpose(rows)[2:] @ np.array(gates)


def curve(points):
    """Linear interpolation: (time, value) points read at every sample."""
    s, value = np.transpose(points)
    return np.interp(np.arange(N) / SR, s, value)


def along(points, hz):
    """Logarithmic interpolation: (frequency, value) points read on a log frequency axis."""
    f, value = np.transpose(points)
    return np.interp(np.log(hz + 1), np.log(f + 1), value)


def amp(db):
    """Decibel law: level to amplitude gain."""
    return 10 ** (np.asarray(db) / 20)


def unit(x):
    """Normalisation: scale to rms 1."""
    return x / np.sqrt(np.mean(x ** 2) + 1e-20)


def add(track, start_s, sound):
    """Superposition: mix a sound into the track from start_s on."""
    room = track[round(start_s * SR):][:len(sound)]
    room += sound[:len(room)]


def scene():
    """Superposition of direct and reverberant sound: everything on the table, heard from close by."""
    motor, film, switch = pump(), crinkles(), clacks()
    reverberant = walls(amp(-18) * motor + amp(-16.5) * film)
    return (motor + film + switch + burps() + reverberant + background())[None]


TOP_HZ = 15900


def record(dry):
    """Band limiting: an ideal low-pass keeps nothing from TOP_HZ upward."""
    return filtered(dry[0], lambda hz: hz < TOP_HZ)[None]


dry = scene()
out = record(dry)
generate_wav(out)
```